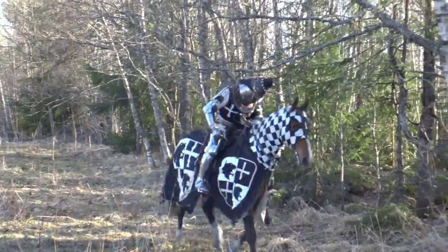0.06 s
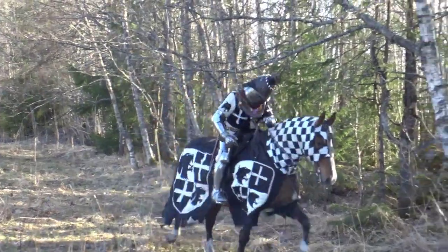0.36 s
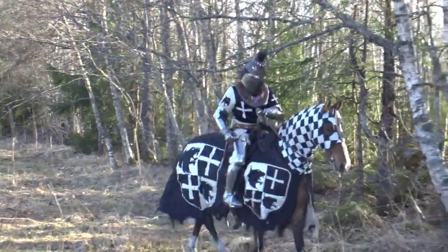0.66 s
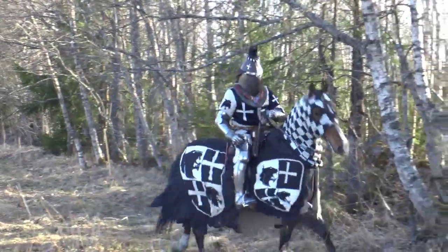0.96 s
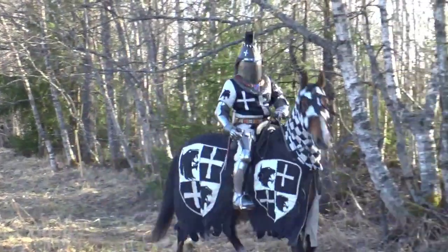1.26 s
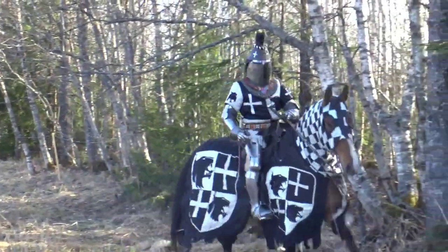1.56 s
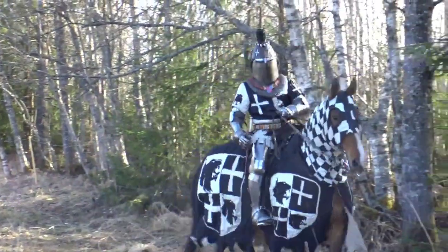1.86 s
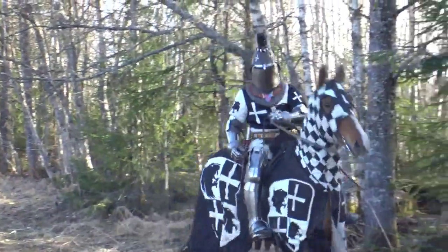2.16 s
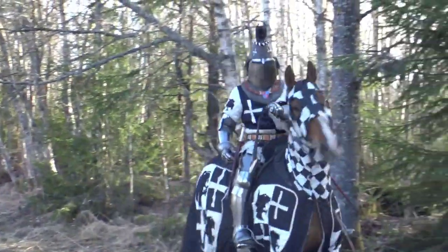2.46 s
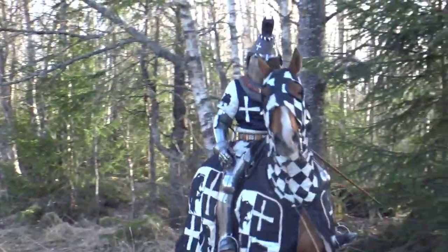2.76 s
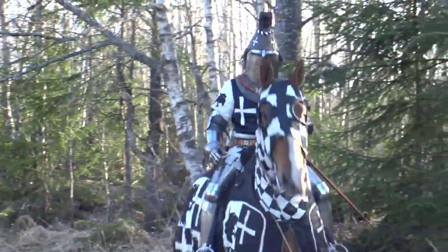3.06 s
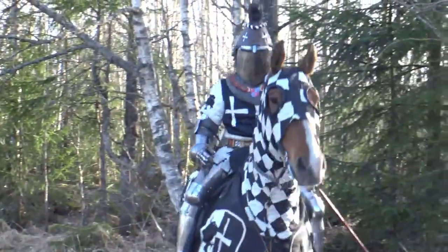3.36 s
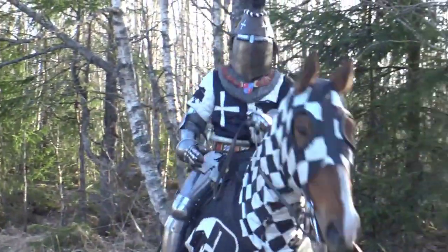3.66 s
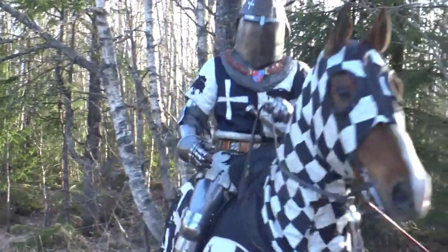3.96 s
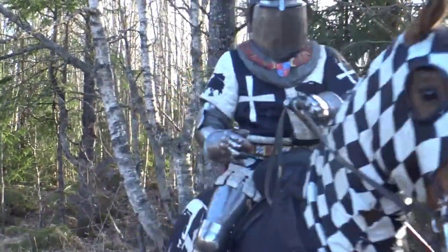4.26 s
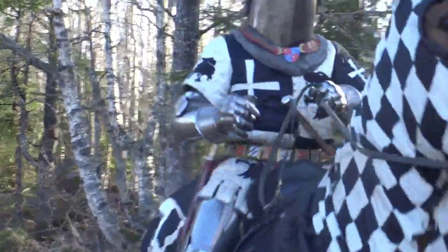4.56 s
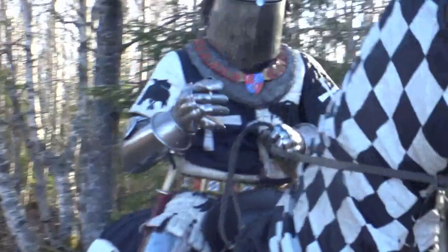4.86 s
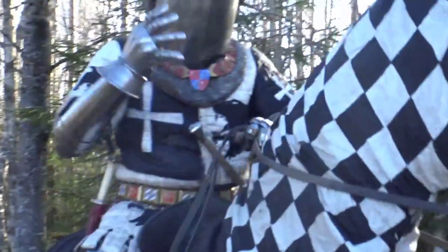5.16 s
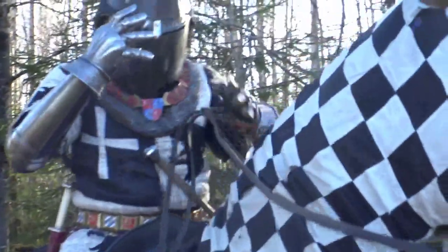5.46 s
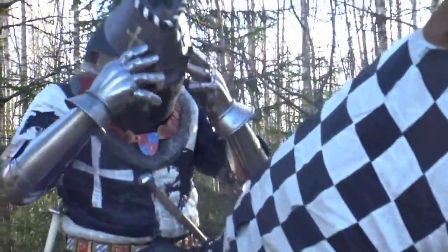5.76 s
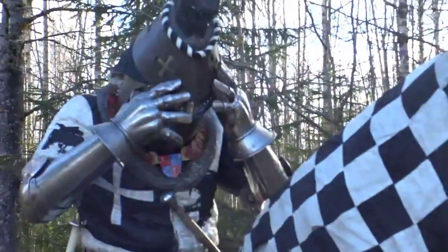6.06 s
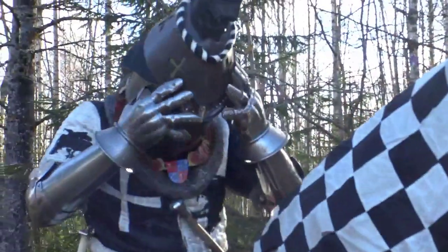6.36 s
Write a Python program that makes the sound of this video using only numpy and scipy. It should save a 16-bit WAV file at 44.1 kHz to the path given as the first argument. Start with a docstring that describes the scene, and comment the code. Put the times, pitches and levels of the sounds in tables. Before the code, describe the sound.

Crunching hoof steps in dry grass come from a little way off to right beside the microphone, dotted with crisp cracks of breaking twigs. Heavy cloth sweeps by with a soft rumble and the steps stop. Close armour takes over: a quick rattle of finger plates, sharp clinks, short clanks on a helmet and a light metallic rasp. The place is still woodland, with a faint hush of air and a thin echo.

```python
"""A horse walks up through dry grass and twigs at a wood's edge, carrying an armoured rider.
Brittle fracture makes the steps: stalks crackle in thousands, twigs snap singly. Friction makes the
cloth cover swish, with soft low bumps and a rumble. As the horse halts, steel gauntlets rattle and
strike the helmet, exciting the modes of both, and the helmet scrapes as the rider starts to pull it off.
The trunks scatter a thin echo of the snaps and clinks, over faint moving air."""
import sys
import numpy as np
from scipy import signal
from scipy.fft import rfft, irfft, next_fast_len
from scipy.io import wavfile
from scipy.ndimage import uniform_filter1d, map_coordinates

SR = 44100
rng = np.random.default_rng(int(sys.argv[2]) if len(sys.argv) > 2 else 0)


def materialize(psi):
    """Save the field psi as 16-bit PCM at rate SR to the path in sys.argv[1].

    A 1-D psi becomes a single channel; in a 2-D psi each row is a channel.
    """
    bounded = np.clip(np.atleast_2d(psi).T, -1, 1)
    quanta = np.round(bounded * 32767).astype(np.int16)
    wavfile.write(sys.argv[1], SR, quanta)


N = 291501

# Levels are relative within each table; spectra give level per unit bandwidth.
# hooves and legs pushing into grass: peak t/s, level/dB, rise/s, fall/s
HOOF_STEPS = [(0.009, -39.5, 0.041, 0.063), (0.212, -41.5, 0.122, 0.082), (0.423, -44.5, 0.05, 0.042),
              (0.551, -35.0, 0.029, 0.041), (0.795, -36.0, 0.079, 0.033), (1.008, -43.5, 0.043, 0.025),
              (1.116, -31, 0.02, 0.032), (1.321, -37, 0.114, 0.08), (1.631, -39.0, 0.04, 0.046),
              (1.724, -35.5, 0.043, 0.063), (1.906, -33.5, 0.044, 0.069), (2.253, -31, 0.025, 0.046),
              (2.372, -39.5, 0.054, 0.098), (2.493, -31.0, 0.017, 0.072), (2.681, -35.0, 0.037, 0.065),
              (2.807, -30.5, 0.057, 0.094), (3.04, -32.5, 0.122, 0.124), (3.122, -26.5, 0.007, 0.01),
              (3.208, -39.0, 0.056, 0.125), (3.433, -33.0, 0.046, 0.137), (3.622, -31.0, 0.091, 0.107),
              (3.872, -28.5, 0.023, 0.053), (3.947, -22, 0.042, 0.025), (4.12, -32.0, 0.151, 0.065),
              (4.2, -29.0, 0.033, 0.035), (4.257, -28.5, 0.016, 0.034), (4.465, -28, 0.038, 0.036),
              (4.563, -26.5, 0.026, 0.075), (4.679, -24.5, 0.049, 0.041), (4.789, -29.5, 0.092, 0.118)]
# grass brushed between steps: t/s, level/dB
GRASS_BRUSHING = [(0.0, -44), (0.48, -53), (0.65, -45), (1.2, -48), (1.5, -48), (2.0, -43), (2.19, -50.5),
                  (2.6, -44.5), (3.8, -41), (4.4, -38), (4.97, -44), (5.17, -38), (5.6, -55.5)]
# spectrum of stalks breaking far off: f/Hz, level/dB
FAR_STALK_SPECTRUM = [(240, -32), (400, -8), (506, -34), (574, -11.5), (1280, 0), (1540, -5.5), (1970, 0.5),
                      (3430, -1.5), (4850, 2.5), (5580, -1.5), (6060, 1.5), (10100, -2), (11000, -2.5),
                      (14300, -118), (22000, -120)]
# spectrum of stalks breaking close by: f/Hz, level/dB
NEAR_STALK_SPECTRUM = [(240, -20), (400, -7), (499, -17), (932, -7.5), (1670, -7.5), (2080, -2.5),
                       (2670, -5), (3530, -3), (8110, -1.5), (10600, -3.5), (11000, -7), (14300, -79),
                       (22000, -120)]
# twigs breaking: t/s, level/dB, woody body re level/dB
TWIG_BREAKS = [(0.0416, -16.5, -39), (1.102, -28, -17), (1.3349, -23, -11), (1.8996, -18, -29),
               (2.0652, -31, -4.5), (2.534, -23, -35), (2.5531, -11, -36), (2.6665, -5.5, -24),
               (2.7729, -1.5, -32), (2.7802, -5.5, -33), (2.9078, -11.5, -22), (3.1592, -11, -39),
               (3.2118, -26.5, -6), (3.2928, -10, -25), (3.311, -9.5, -26), (3.3868, -16.5, -32),
               (3.422, -6, -30), (3.5314, -11.5, -33), (3.6045, -9.5, -39), (3.6581, -7.5, -28),
               (3.6656, -12, -20), (3.7372, -16, -17.5), (3.8348, -18.5, -15), (3.9372, -3.5, -23),
               (3.9597, -12, -35), (4.0788, -11, -36), (4.1792, -12.0, -14), (4.2659, -24, -28),
               (4.37, -11, -46), (4.6788, -10, -19), (4.754, -3, -21.5), (4.783, -17.5, -7),
               (4.8344, -11, -35), (4.842, -7, -25)]
# spectrum of a sharp crack: f/Hz, level/dB
CRACK_SPECTRUM = [(200, -22), (700, -21), (2000, -7), (4500, 7.5), (11000, 3.5)]
# steel striking steel: t/s, gauntlet level/dB, helmet level/dB, favoured f/Hz
STEEL_IMPACTS = [(5.643, -29, -42, 1620), (5.651, -30.5, -44.5, 2440), (5.8183, -16, -60, 4300),
                 (5.8199, -22.5, -45, 2100), (5.835, -30, -45, 3420), (6.007, -28, -32.5, 1800),
                 (6.107, -37, -40, 1270), (6.462, -31.5, -26, 1605), (6.468, -29, -28.5, 4500),
                 (6.474, -41, -27, 185), (6.514, -38, -33.5, 2200), (6.534, -26, -28.5, 2070),
                 (6.539, -31, -28, 764), (6.561, -32, -36, 1326), (6.578, -52, -34.5, 767)]
# modes of a gauntlet plate: f/Hz, level/dB, T60/s
PLATE_MODES = [(1033, -5, 0.075), (1720, 0.5, 0.038), (1910, -3, 0.033), (2195, -4.5, 0.066),
               (2415, -7, 0.071), (2970, -12.5, 0.15), (3400, -9, 0.078), (3430, -12, 0.092),
               (4235, -6, 0.037), (4350, -5.5, 0.054), (4640, -14, 0.062), (5440, -6, 0.052),
               (5830, -0.5, 0.047), (6330, 4.5, 0.017), (6940, 2, 0.017)]
# modes of the helmet: f/Hz, level/dB, T60/s
HELMET_MODES = [(177, -7.5, 0.065), (257, -11, 0.056), (333, -5, 0.07), (624, -5, 0.064),
                (760, -20.5, 0.76), (811, -7, 0.069), (975, -11, 0.067), (1387, -12.5, 0.27),
                (1600, -10, 0.11), (1970, -5.5, 0.064), (2114, -13, 0.12), (2490, -11, 0.058),
                (3690, -11, 0.091), (4200, -26, .08)]
# spectrum of the dense high modes of thin steel: f/Hz, level/dB
CLASH_SPECTRUM = [(300, -29), (700, -9), (1000, 1), (1400, 1.5), (2200, 4.5), (2800, -4.5), (4300, 2.5),
                  (5900, -6), (7500, -4.5), (10500, -8.5)]
# ticks of buckles and finger plates: t/s, level/dB, body re level/dB
BUCKLE_TICKS = [(5.217, -35, -30), (5.4216, -34, 0), (5.4927, -20, -22), (5.516, -19, -21),
                (5.6857, -11.5, -24), (5.7682, -13.5, -21), (6.0442, -9.5, -45)]
# plates sliding on mail and helmet: peak t/s, level/dB, rise/s, fall/s, singing re level/dB
SLIDING_STROKES = [(5.066, -35, .045, 0.032, -12), (5.223, -36.5, 0.017, 0.031, -7.5),
                   (5.304, -40.5, 0.013, 0.042, -6), (5.41, -49, 0.076, 0.1, 6.5),
                   (5.55, -56.5, .04, 0.067, 7.5), (5.74, -45.5, 0.067, 0.066, 2.5),
                   (5.89, -48.5, 0.048, 0.0326, 4.5), (5.985, -41.5, 0.079, 0.06, -0.5),
                   (6.246, -36, 0.08, 0.19, -5), (6.35, -43.5, 0.052, .04, -1),
                   (6.44, -39, 0.073, 0.17, 0.5)]
# spectrum of rasping steel: f/Hz, level/dB
RASP_SPECTRUM = [(260, -54), (450, -26), (672, 4.5), (867, -6.5), (1000, -2), (1280, -4.5), (1560, 2.5),
                 (2150, -13), (2740, -3), (3670, 3), (4090, 3.5), (4430, 5.5), (5060, 3), (9120, -3),
                 (11000, -7.5), (14300, -61), (22000, -120)]
# resonances driven by sliding: f/Hz, bandwidth/Hz, level/dB
SINGING_RESONANCES = [(1010, 68, 2.5), (1680, 150, 2.5), (2120, 230, 6), (2404, 70, 5), (3380, 58, 4),
                      (3690, 64, -8), (4370, 65, -0.5), (4870, 37, -16), (5970, 90, -3), (6360, 44, -6),
                      (7700, 45, -24)]
# folds of the cover sweeping past: peak t/s, level/dB, rise/s, fall/s
COVER_FOLDS = [(3.2, -48, 0.21, .12), (3.68, -44.5, 0.056, 0.043), (4.62, -36, 0.35, 0.13),
               (4.805, -32.5, 0.038, 0.036), (4.95, -46, 0.11, .15)]
# spectrum of cloth and turf: f/Hz, level/dB
SWISH_SPECTRUM = [(30, -13), (70, -8.5), (160, 0.5), (290, 3), (480, -2.5), (730, 0.5), (1600, -6.5),
                  (2600, -17), (4400, -59)]
# soft low bumps: onset t/s, level/dB, f/Hz, rise/s
LOW_BUMPS = [(0.22, -43, 149, 0.015), (0.553, -49, 131, 0.013), (1.941, -34, 143, 0.012),
             (1.955, -44, 55.6, 0.023), (2.401, -37, 60, 0.0078), (2.505, -44, 100, 0.018),
             (3.675, -30.5, 61, 0.02), (4.913, -31.5, 86, 0.012), (5.46, -30.5, 80, 0.013),
             (5.596, -29.5, 74, 0.0075)]
# spectrum of the rustle in a bump: f/Hz, level/dB
BUMP_SPECTRUM = [(20, -3), (100, 3.5), (150, -8), (260, -44), (900, -57)]
# rumble as the horse turns and brushes past: peak t/s, level/dB, rise/s, fall/s
RUMBLE_SURGES = [(2.27, -58, .05, 0.18), (4.6, -53, 0.71, 0.5), (4.96, -38.5, 0.074, 0.12),
                 (5.27, -42, 0.057, 0.14), (5.48, -41.5, .12, 0.12), (6.33, -52, 0.3, 0.29)]
# spectrum of the rumble: f/Hz, level/dB
RUMBLE_SPECTRUM = [(20, -3), (50, 5), (140, 2.5), (200, -25), (400, -50), (900, -80)]
# reverberation among the trunks: f/Hz, T60/s
TRUNK_DECAY = [(200, 0.16), (2000, 0.084), (10000, 0.2)]
# spectrum of moving air: f/Hz, level/dB
AIR_SPECTRUM = [(15, -33), (25, 9), (59, 0), (118, -5), (505, 1.5), (1230, -1.5), (1550, -6.5),
                (2050, -2.5), (2710, -6), (4180, -4.5), (10200, -9), (11000, -22), (14300, -57),
                (22000, -120)]
# likeness of left and right: f/Hz, correlation/1
STEREO_COHERENCE = [(50, 0.96), (300, 0.91), (1500, .97), (5000, 0.976), (10000, 0.85)]

HALT_S = 5.6  # the horse comes to a stand
SPLINTERS_PER_S, SPLINTER_DB, SPLINTER_BODY_DB = 8.2, 9, -18.5
TWIG_T60_S, TICK_T60_S = 0.021, 0.012
RATTLE_S, RATTLE_GAP_S, RATTLE_SWELL_S = 5.068, 0.008, 0.027
RATTLE_DB, RATTLE_BODY_DB = -11, -14
GRIP_START_S, GRIP_END_S, HOLLOW_DB = 5.4, 5.75, -5.5  # the hands close on the helmet
TURF_DB, COVER_DB = -19.5, -55  # turf re stalks; steady sway of the cover
SWELL_SHAPE = 1.4  # 1 = pointed top, 2 = rounded top
CUTOFF_HZ = 11150


def crushing():
    """Incoherent sources add in power: steps and steady brushing give the envelope of crushed grass."""
    t = np.arange(N) / SR
    brushing_db = np.interp(t, *np.transpose(GRASS_BRUSHING)) - 280 * np.maximum(t - HALT_S, 0)
    return np.hypot(swells(HOOF_STEPS), amp(brushing_db))


def grass(crush):
    """Brittle fracture: harder steps break more stalks; close by, single stalks stand out."""
    nearness = np.interp(np.arange(N) / SR, [1.8, 3.2], [0, 1])
    breaking = crackle(1000 * np.sqrt(unit(crush)), scatter_db=3.5 + 2.0 * nearness, life_s=0.001)
    tufts = patchy(breaking + amp(1) * rng.standard_normal((2, N)), depth_db=2.0)
    far = coloured(tufts, FAR_STALK_SPECTRUM)
    near = coloured(tufts, NEAR_STALK_SPECTRUM)
    return spread(crush * ((1 - nearness) * far + nearness * near))


def twigs():
    """A bent twig releases its elastic energy at once as it breaks."""
    return snaps(TWIG_BREAKS, body_hz=1270, t60=TWIG_T60_S)


def splinters(crush):
    """A random point process: small twigs give way more often and louder under harder steps."""
    cumulative_chance = np.cumsum(np.sqrt(crush))
    when, strength = rng.random((int(SPLINTERS_PER_S * HALT_S), 2)).T
    onsets = np.searchsorted(cumulative_chance, when * cumulative_chance[-1])
    levels_db = 20 * np.log10(crush[onsets]) + SPLINTER_DB + 6 * (strength - 0.5)
    rows = [(onset / SR, db, SPLINTER_BODY_DB) for onset, db in zip(onsets, levels_db)]
    return snaps(rows, body_hz=1300, t60=0.011)


def snaps(rows, body_hz, t60):
    """Impulse response of a twig or small plate: a broadband crack, brief modes and a duller knock."""
    track, t = np.zeros((2, N)), np.arange(SR // 12) / SR
    for s, db, body_db in rows:
        burst = unit(np.tanh(coloured(rng.standard_normal(len(t)), CRACK_SPECTRUM)))  # evened peaks
        crack = amp(-2.0) * burst * (decay(t, t60) + decay(t, 0.0036))
        modes = ring([(hz, -17, t60) for hz in rng.uniform(2500, 10500, size=14)], t)
        pitch_hz = body_hz * np.exp(rng.uniform(-0.055, 0.24))
        body = unit(resonate(rng.standard_normal(len(t)), pitch_hz, 1.1 * pitch_hz, stages=2))
        snap = crack + modes + amp(body_db + 11.5) * body * decay(t, 0.034)
        pan = np.clip(rng.normal(0, 0.081), -0.5, 0.5)
        add(track, s, amp(db - 10) * snap * np.array([[1 + pan], [1 - pan]]))
    return track


def clanks():
    """Impact sets gauntlet and helmet in free vibration, damped by hands and padding."""
    track, t = np.zeros(N), np.arange(SR // 5) / SR
    attack = 1 - np.exp(-t / 0.00025)
    for s, plate_db, helmet_db, favoured_hz in STEEL_IMPACTS:
        clash = coloured(rng.standard_normal(len(t)), CLASH_SPECTRUM) * decay(t, 0.038)
        knock = unit(resonate(rng.standard_normal(len(t)), 1180, width_hz=1300)) * decay(t, 0.061)
        plate = amp(-4.5) * ring(favour(PLATE_MODES, favoured_hz, boost_db=9.5), t) + amp(2.5) * clash
        helmet = ring(favour(HELMET_MODES, favoured_hz, boost_db=16.5), t) + amp(1.5) * knock
        add(track, s, (amp(plate_db) * plate + amp(helmet_db) * helmet) * attack)
    return track * amp([[0.4], [-0.4]])


def ticks():
    """Light impacts ring buckles and finger plates, whose high modes are heavily damped."""
    return snaps(BUCKLE_TICKS, body_hz=1820, t60=TICK_T60_S)


def rattle(count=11):
    """A train of collisions: as a gauntlet lifts, its plates fall together in a quick uneven run."""
    offsets = RATTLE_GAP_S * (np.arange(count) - count // 2 + rng.uniform(-0.22, 0.38, size=count))
    sizes = swell(offsets, 0, RATTLE_DB, RATTLE_SWELL_S, RATTLE_SWELL_S)
    rows = [(RATTLE_S + s, 20 * np.log10(size), RATTLE_BODY_DB) for s, size in zip(offsets, sizes)]
    return snaps(rows, body_hz=1860, t60=TICK_T60_S)


def scrape():
    """Stick-slip friction on mail and padding rasps and drives the plates and the helmet's cavity."""
    rubbing = swells([row[:4] for row in SLIDING_STROKES])
    singing = swells([(s, db + sing_db, rise, fall) for s, db, rise, fall, sing_db in SLIDING_STROKES])
    grip = np.interp(np.arange(N) / SR, [GRIP_START_S, GRIP_END_S], [0, 1])
    slips = crackle(2700, scatter_db=-1.0, life_s=0.0029)
    rasp = coloured(patchy(slips, depth_db=3.5), RASP_SPECTRUM)
    steel = np.zeros((2, N))
    for hz, width_hz, db in SINGING_RESONANCES:
        coupling = amp(db + 5.5 * np.tanh(wobble(13)))  # the moving contact feeds each mode unevenly
        steel += coupling * signal.lfilter(*signal.iirpeak(hz, hz / width_hz, SR), slips)
    cavity = unit(resonate(slips, 244, width_hz=122, stages=2) * amp(2.5 * wobble(35)))
    friction = rubbing * (amp(3.5) * rasp + amp(HOLLOW_DB) * grip * cavity)
    return spread(friction + singing * unit(steel)) * amp([[0.4], [-0.4]])


def cloth_and_turf(crush):
    """Friction noise: turf and heavy cover swish with each step, loudest as the horse sweeps past."""
    t = np.arange(N) / SR
    sway = amp(COVER_DB - 250 * np.maximum(t - HALT_S, 0))
    envelope = np.sqrt(sway ** 2 + (amp(TURF_DB) * crush) ** 2 + swells(COVER_FOLDS) ** 2)
    rubbing = patchy(crackle(500, scatter_db=-4.0, life_s=0.0036), depth_db=3.0)
    return spread(envelope * coloured(rubbing, SWISH_SPECTRUM))


def bumps():
    """Soft pushes make wave packets: a low tone and a dull rustle swell and die in a few cycles."""
    track, t = np.zeros(N), np.arange(SR // 3) / SR
    for s, db, hz, rise_s in LOW_BUMPS:
        envelope = (t / rise_s * np.exp(1 - t / rise_s)) ** 2
        rustle = coloured(rng.standard_normal(len(t)), BUMP_SPECTRUM)
        add(track, s, amp(db - 4.5) * envelope * (np.sin(2 * np.pi * hz * t) + amp(-4.5) * rustle))
    return track


def rumble():
    """Amplitude-modulated low noise surges unevenly as the horse turns and brushes past."""
    low = coloured(rng.standard_normal((2, N)), RUMBLE_SPECTRUM)
    return spread(swells(RUMBLE_SURGES) * unit(low * amp(3.2 * wobble(30))))


def trunk_echo(sound):
    """Scattering by trunks: convolution with a noise tail whose decay time depends on frequency."""
    hz, t, spectra = signal.stft(rng.standard_normal((2, SR // 2)), SR, nperseg=256)
    tail = signal.istft(spectra * decay(t, along(TRUNK_DECAY, hz)[:, None]), SR, nperseg=256)[1]
    return signal.fftconvolve(sound, tail / np.linalg.norm(tail[0]), axes=1)[:, :N]


def air():
    """Broadband flow noise of air among the trees, with a far narrow-band drone."""
    hush = coloured(rng.standard_normal((2, N)), AIR_SPECTRUM)
    drone = unit(resonate(rng.standard_normal((2, N)), 54.7, width_hz=20.6, stages=2))
    return spread(amp(-51.5 + 1.8 * wobble(1.77)) * hush + amp(-60.0) * drone)


def crackle(per_s, scatter_db, life_s):
    """Shot noise: tiny fractures or slips arrive at random as decaying bursts of uneven size."""
    size = amp(scatter_db * np.minimum(rng.exponential(size=N), 4))
    impulses = (rng.random(N) < per_s / SR) * size ** 2
    power = signal.lfilter([1], [1, -np.exp(-1 / (life_s * SR))], impulses)
    power /= np.abs(uniform_filter1d(power, size=3001)) + 1e-9  # hold the local mean steady
    return np.sqrt(power) * rng.standard_normal((2, N))


def patchy(x, depth_db):
    """Spectral modulation in random patches, a few hundred Hz wide and some tens of ms long."""
    spectra = signal.stft(x, nperseg=256)[2]
    across_bands = uniform_filter1d(rng.standard_normal(spectra.shape[1:]), size=3, axis=0)
    patches = uniform_filter1d(across_bands, size=14, axis=1)
    return signal.istft(spectra * amp(depth_db * unit(patches)), nperseg=256)[1][:, :N]


def ring(modes, t):
    """Modal superposition: damped sinusoids, with new strengths and phases at each blow."""
    hz, db, t60 = np.transpose(modes)[:, :, None]
    phase = 2 * np.pi * rng.random(hz.shape)
    strength = amp(db + rng.normal(0, 1.3, hz.shape))
    return np.sum(strength * decay(t, t60) * np.sin(2 * np.pi * hz * t + phase), axis=0)


def favour(modes, centre_hz, boost_db):
    """Selective excitation: the contact point lifts the modes near one frequency."""
    return [(hz, db + boost_db * np.exp(-(np.log(hz / centre_hz) / 0.068) ** 2), t60)
            for hz, db, t60 in modes]


def swell(t, peak_s, db, rise_s, fall_s):
    """Envelope of a movement that builds to a peak and dies away."""
    distance = np.abs((t - peak_s) / np.where(t < peak_s, rise_s, fall_s))
    return amp(db) * np.exp(-distance ** SWELL_SHAPE)


def swells(rows):
    """Envelope of overlapping movements, whose powers add."""
    t = np.arange(N) / SR
    coarse_t = t[::32]
    power = sum(swell(coarse_t, *row) ** 2 for row in rows)
    return np.interp(t, coarse_t, np.sqrt(power))


def spread(pair):
    """Partial coherence: two unrelated signals, as mid and side, form a narrow stereo image."""
    def weights(hz):
        angle = np.arccos(np.clip(along(STEREO_COHERENCE, hz), -1, 1)) / 2
        return np.array([np.cos(angle), np.sin(angle)])
    mid, side = filtered(pair, weights)
    return np.array([mid + side, mid - side])


def resonate(x, centre_hz, width_hz, stages=1):
    """Forced response of damped resonators in cascade."""
    def response(hz):
        damping = 1j * hz * width_hz
        return (damping / (centre_hz ** 2 - hz ** 2 + damping)) ** stages
    return filtered(x, response)


def coloured(x, spectrum):
    """Spectral shaping, at unit rms."""
    return unit(filtered(x, lambda hz: amp(along(spectrum, hz))))


def filtered(x, response):
    """Linear filtering: the spectrum is multiplied by a frequency response."""
    n = x.shape[-1]
    padded = next_fast_len(n + 8192)
    return irfft(rfft(x, padded) * response(np.fft.rfftfreq(padded, 1 / SR)), padded)[..., :n]


def along(points, hz):
    """Interpolation of (f/Hz, value) points on a logarithmic frequency axis."""
    knots_hz, values = np.transpose(points)
    return np.interp(np.log(hz + 1), np.log(knots_hz + 1), values)


def wobble(knots_per_s):
    """Slow fluctuation: a spline through random knots."""
    knots = rng.standard_normal(int(N * knots_per_s / SR) + 4)
    return map_coordinates(knots, [np.arange(N) * knots_per_s / SR])


def decay(t, t60):
    """Exponential decay by 60 dB in t60 seconds."""
    return amp(-60 * t / t60)


def amp(db):
    """Amplitude ratio of a level in decibels."""
    return 10 ** (np.asarray(db) / 20)


def unit(x):
    """Normalisation to unit rms."""
    return x / np.sqrt(np.mean(x ** 2) + 1e-20)


def add(track, s, sound):
    """Superposition of a sound on a track, starting at s seconds."""
    part = track[..., max(round(s * SR), 0):][..., :sound.shape[-1]]
    part += sound[..., :part.shape[-1]]


def scene():
    """Sound pressures add: steps slightly to the right, snaps and clinks with their echo, and the rest."""
    crush = crushing()
    steps = (grass(crush) + cloth_and_turf(crush)) * amp([[-0.2], [0.2]])
    armour = ticks() + rattle() + clanks()
    sliding_steel = scrape()
    background = bumps() + rumble() + air()
    transients = armour + twigs() + splinters(crush)
    return steps + transients + amp(-15.0) * trunk_echo(transients) + sliding_steel + background


def record(dry):
    """Band limiting: a steep low-pass removes the highest treble."""
    return filtered(dry, lambda hz: 1 / np.sqrt(1 + (hz / CUTOFF_HZ) ** 200))


dry = scene()
out = record(dry)
materialize(out)
```